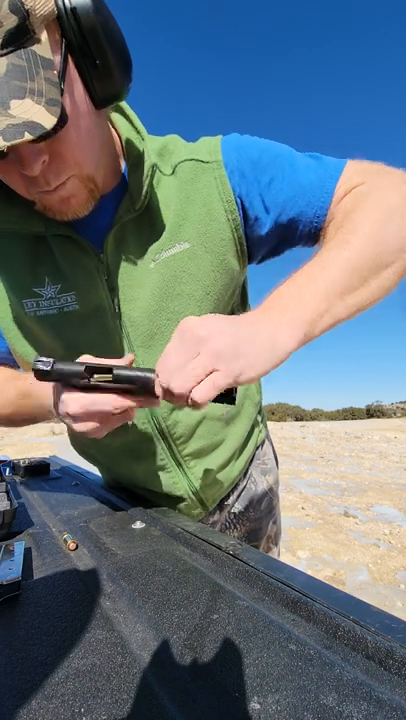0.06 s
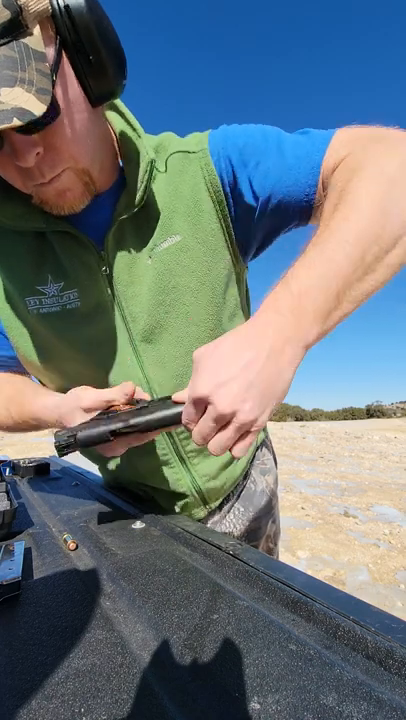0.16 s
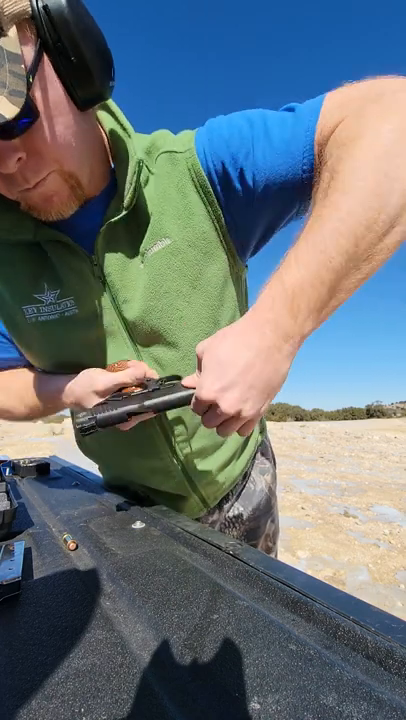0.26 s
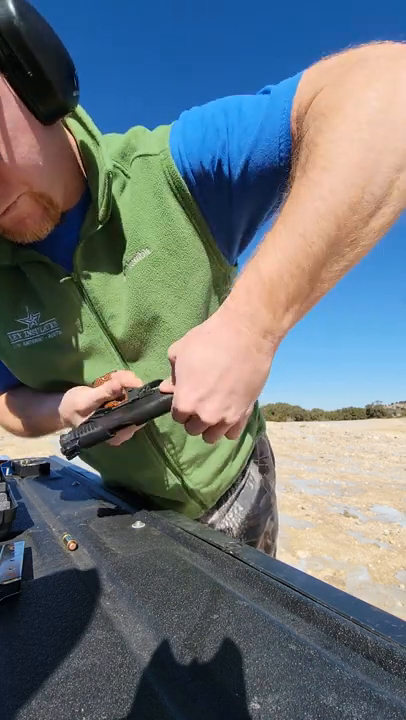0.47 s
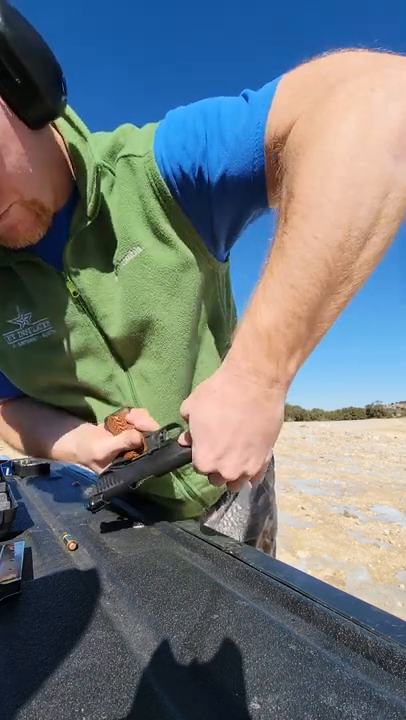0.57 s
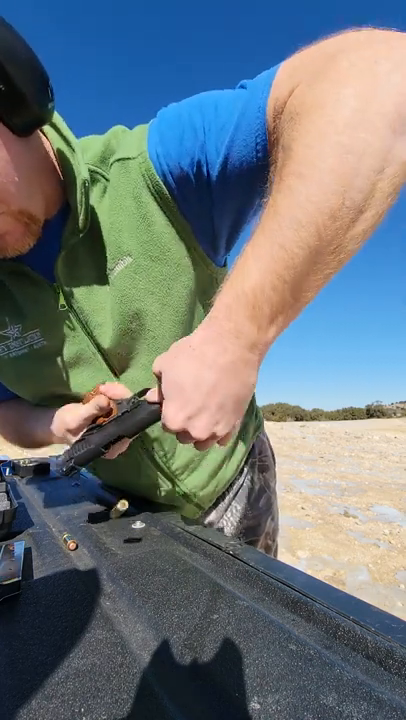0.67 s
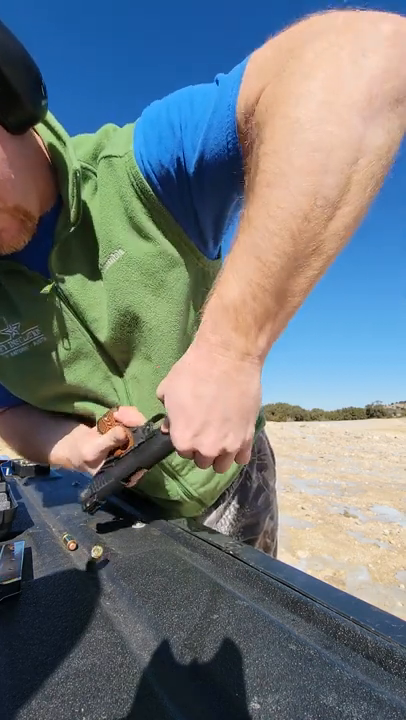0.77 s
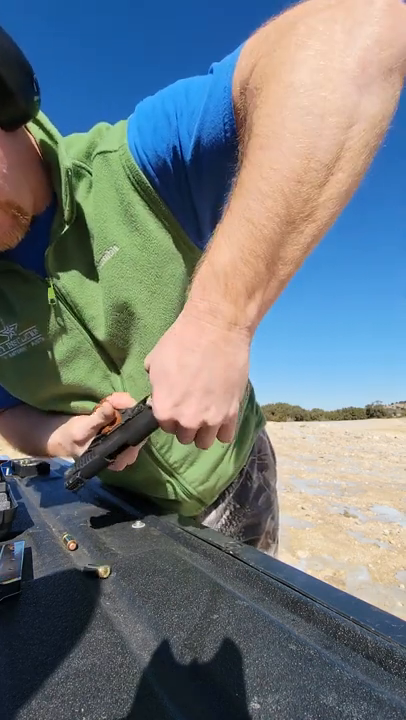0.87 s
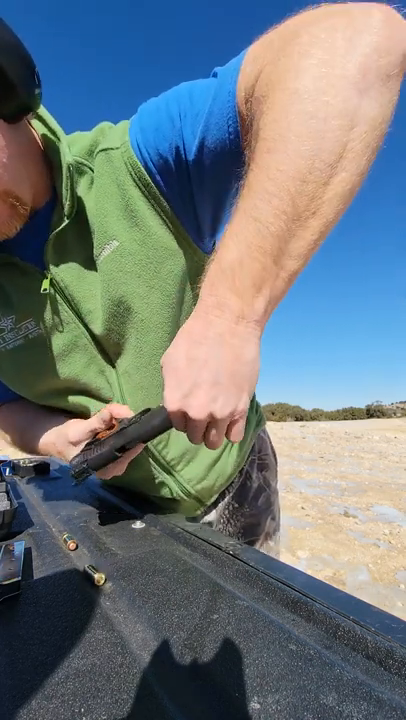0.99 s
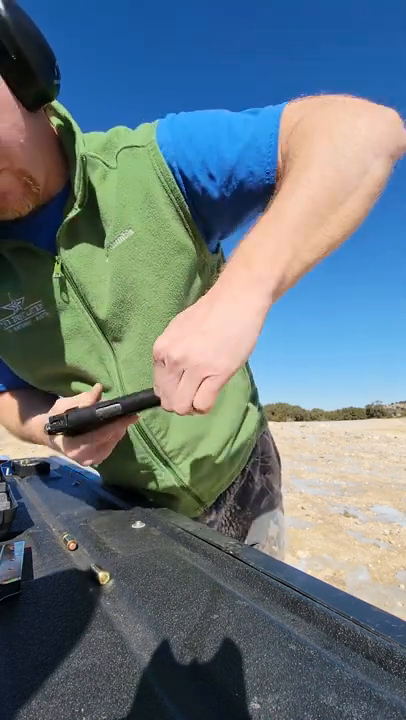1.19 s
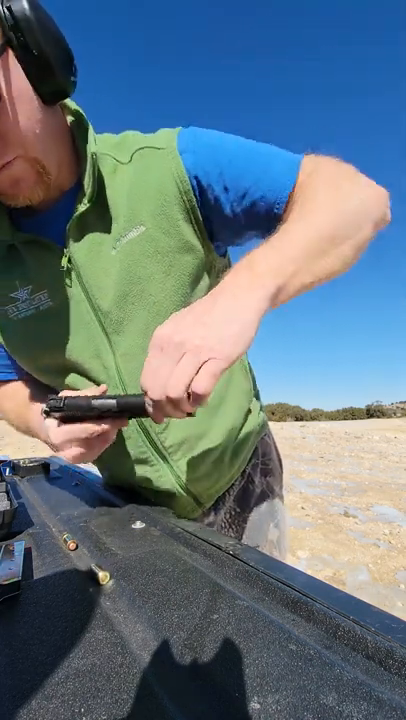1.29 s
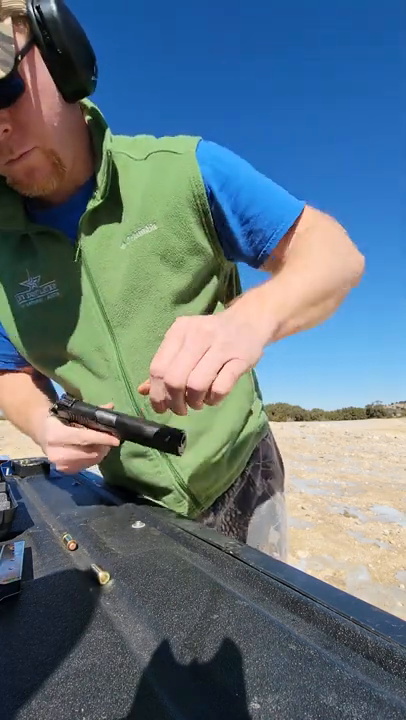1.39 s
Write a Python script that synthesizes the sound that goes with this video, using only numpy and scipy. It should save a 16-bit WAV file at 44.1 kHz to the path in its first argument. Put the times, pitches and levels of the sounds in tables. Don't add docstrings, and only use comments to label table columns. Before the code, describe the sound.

Close up in open air, handgun steel clacks and chatters in short bursts, a falling round knocks and bounces on a hard hollow surface, and the slide cracks closed, over light wind buffeting and faint hiss.

```python
import sys
import numpy as np
from scipy import signal
from scipy.fft import rfft, irfft, next_fast_len
from scipy.io import wavfile

SR = 44100
rng = np.random.default_rng(int(sys.argv[2]) if len(sys.argv) > 2 else 0)


def gain_from_db(level_db):
    decades = np.asarray(level_db, float) / 20
    return 10 ** decades


def unload_wav(signal):
    wavfile.write(
        sys.argv[1],
        SR,
        np.round(np.clip(np.atleast_2d(signal).T, -1, 1) * 32767).astype(np.int16),
    )


N = 63945

# t/s, peak level/dB, loudest ring f/Hz, contact/ms, brightness/dB
PULL_KNOCKS = [(.2096, -20.5, 1500, 5.1, -36), (.2225, -13.5, 5230, 1.1, -65),
               (.2255, -14, 4500, 0.86, -42), (.2448, -0.5, 5350, 0.53, -23.5),
               (.2665, -9, 5470, 0.98, -50), (.2752, -20, 5360, 1.01, -20), (.2795, -23, 6340, 1.9, -44),
               (.3985, -38, 5740, 2.5, -12), (.4155, -24, 3610, 2.33, -31), (.4545, -12.5, 5000, 1.07, -24),
               (.4882, -3.5, 4200, 2.05, -41), (.4906, -19, 4300, 0.96, -24),
               (.4988, -15, 3300, 1.1, -24.5), (.5102, -12, 6100, 1.47, -20), (.5135, -20, 3200, 3.5, -26),
               (.5205, -21.5, 4970, 3, -24), (.5368, -5, 3780, 1.02, -12), (.5395, -8.5, 5500, 2.2, -44)]
# t/s, peak level/dB, loudest ring f/Hz, contact/ms, brightness/dB
JIGGLE_KNOCKS = [(0.609, -24.5, 2200, 1.2, -32), (0.6184, -26, 3570, 0.49, -39),
                 (0.6269, -15, 3280, 0.72, -23), (0.63, -3, 5150, 0.9, -71), (0.6404, -22, 2570, 1.4, -29),
                 (0.6484, -24.5, 4900, 1.8, -27), (0.6534, -31.5, 6320, 0.89, 2),
                 (0.6614, -13, 3860, 1.195, -51), (0.6799, -19, 2100, 2.7, -16),
                 (0.6864, -20.5, 3540, 2.1, -49), (0.7053, -9, 5800, 1.5, -64),
                 (0.7084, -11, 6250, 1.3, -19), (0.7164, -10, 4840, 0.92, -33),
                 (0.7214, -22.5, 4950, 1.24, -38), (0.7447, -20, 5320, 2.3, -24),
                 (0.8026, -22.5, 2570, 1.16, -44)]
# t/s, peak level/dB, loudest ring f/Hz, contact/ms,
# brightness/dB
MORE_KNOCKS = [
    (.282, -24, 5570, 1.2, -42),
    (.388, -41, 5940, 0.76, -20),
    (.5435, -21, 4500, 1.4, -30),
    (.553, -34, 4000, 1.7, -28),
    (.811, -31, 4900, 2.1, -22),
    (1.30, -60, 6030, 1.1, -8),
    (1.382, -57.5, 2600, 1.46, -32.5),
]
# t/s, peak level/dB, loudest ring f/Hz, contact/ms, brightness/dB
CLOSE_KNOCKS = [
    (1.0803, -24.5, 6570, 0.67, -18.5),
    (1.099, -18, 4660, 1.02, -17),
    (1.1700, -13.5, 3220, 1.5, -24.5),
    (1.1735, -17.5, 5410, 2.5, -29.5),
    (1.1784, 1, 5090, 1.5, -19),
    (1.1928, -5, 6400, 1.09, -5),
    (1.35, -50, 5900, 1.1, -21),
]
# t/s, peak level/dB, f/Hz, t60/ms, rise/ms
STEEL_RINGS = [(.2235, -41.5, 922, 40, 2.7), (.2275, -46, 537, 24, 2.1), (.227, -32, 2625, 17, 1.2),
               (.2455, -29, 2520, 15, 1.9), (.4155, -35.5, 1003, 21, 0.88), (.4885, -27, 4360, 20, 0.72),
               (.4905, -31.5, 935, 22, 1.6), (.5372, -20, 3350, 12, 0.38), (.5385, -39.5, 1207, 58, 0.83),
               (.609, -44, 964, 70, 0.95), (.680, -32.5, 1250, 41, 1.5), (.681, -33, 3240, 20, 1),
               (.774, -51.5, 604, 19, 3), (.802, -41.5, 1420, 65, 0.56), (.802, -48, 920, 19, 0.62),
               (.639, -51.5, 496, 19, 2), (.4545, -31.5, 2320, 25, 0.59)]
# t/s, peak level/dB, f/Hz, t60/ms, rise/ms
CLOSE_RINGS = [
    (1.1792, -16, 2813, 27, 1.2),
    (1.182, -31.5, 2000, 25, 1.2),
    (1.184, -32, 1011, 30, 2),
    (1.1935, -27, 943, 17, 1.97),
    (1.194, -25.5, 2032, 20, 0.7),
    (1.2005, -34, 1017, 15, 1.8),
    (1.179, -14, 5270, 20, 0.35),
    (1.18, -23.5, 10400, 27, .7),
]
# f/Hz, width/Hz, level/dB
STEEL_MODES = [(1030, 720, -8), (1574, 760, -5), (2570, 480, -1.5), (3200, 1200, -3), (4500, 400, -3.5),
               (5230, 710, -8), (6400, 730, -1.5), (7300, 970, -7)]
# f/Hz, width/Hz, level/dB
SHINE_MODES = [(10400, 1800, 1.5), (12900, 1200, -2.5), (14150, 1200, 7)]
# t/s, level/dB
SCRAPE_PRESSURE = [(.195, -56), (.24, -58), (.285, -79), (.31, -74.5), (0.374, -56.5), (.44, -58),
                   (0.484, -44.5), (.525, -36.5), (.555, -54), (.59, -54), (.62, -49), (0.721, -38.5),
                   (.79, -56.5), (1.0, -76), (1.06, -35), (1.13, -53), (1.18, -35), (1.29, -70)]
# f/Hz, level/dB
STEEL_PAN = [(60, 6.5), (240, 2.5), (700, -3.5), (1290, -7.5), (2380, 0.5), (4400, -9), (15000, -6)]
# f/Hz, level/dB
CLOSE_PAN = [(200, 0.5), (700, -8), (1290, 0.5), (2380, 0.5), (4400, -4), (7500, -16), (10400, 11.5),
             (14000, -7.5)]
# t/s, peak level/dB, loudest ring f/Hz, contact/ms, brightness/dB
CARTRIDGE_TICKS = [
    (.8585, -2, 3370, .6, -44.5),
    (.9995, -7, 2010, 2.6, -43),
    (1.035, -19.5, 1878, 3.7, -35),
    (1.058, -29, 5650, 2.7, -19.5),
]
# f/Hz, width/Hz, level/dB
BRASS_MODES = [(1420, 890, -5), (2075, 250, 2.5), (2930, 1900, -20.5), (3750, 510, 8.5), (5500, 3300, -22)]
# t/s, peak level/dB, f/Hz, t60/ms, rise/ms
BRASS_RINGS = [
    (1.0005, -18, 1504, 45, 1.5),
    (1.001, -24.5, 2080, 85, 1.5),
    (1.0002, -29, 4200, 24, .8),
    (1.001, -33.5, 450, 110, 1.5),
    (0.88, -23, 1480, 70, 2.2),
    (.859, -25, 2080, 175, 0.5),
]
# t/s, level/dB, run-up/s, damping factor, bass level/dB
LANDINGS = [
    (0.8582, -13.5, 0.024, 0.76, -1.4),
    (0.931, -28, 0.00082, 0.19, -6),
    (1.0009, -29.5, 0.0025, 0.99, -11.5),
    (1.034, -36.5, 0.0017, 0.51, 4),
    (1.075, -50, .002, 1, 12.5),
]
# f/Hz, density level/dB per Hz
PANEL_COLOUR = [(50, -8), (200, -4), (600, -0.5), (1400, -8), (2100, -6.5), (3500, -8), (7000, -23),
                (12000, -30)]
# f/Hz, t60/s
PANEL_T60 = [(70, 0.86), (250, 0.53), (800, 0.42), (2000, 0.27), (4000, 0.068), (7000, 0.18), (14000, .27)]
# f/Hz, level/dB, t60/s
PANEL_MODES = [(70.7, -6.5, 0.26), (187.4, -5, 0.46), (219.7, 1, 0.26), (541.3, -4, 0.47), (821, -1.5, 0.3),
               (379.2, -7.5, 0.32), (1484, -12.5, 0.3)]
# f/Hz, level/dB
PANEL_PAN = [(60, 1), (200, 1), (700, -7.5), (2380, -5), (4400, -7), (15000, -5.5)]
# t/s, level/dB
GUSTS = [(0, -46), (0.036, -34.5), (0.078, -49), (.22, -46), (.31, -48.5), (0.4, -43.5), (.5, -55.5),
         (0.671, -37), (0.759, -62), (0.842, -33), (1.1, -59), (1.271, -43.5), (1.45, -52)]
# f/Hz, density level/dB per Hz
WIND_COLOUR = [(12, -47), (24, -13.5), (70, -2.5), (124, -15), (191, -23), (400, -36), (1500, -67.5),
               (1950, -100), (3300, -120)]
# f/Hz, density level/dB per Hz
HISS_COLOUR = [(470, -41), (800, -10.5), (1400, -22), (4340, -22.5), (5240, -9), (6020, -23), (9500, -27),
               (14000, -28)]

STEEL_UNLIKE, PANEL_UNLIKE = 0.55, 0.6


def rms_one(x):
    return x / np.sqrt(np.mean(x ** 2) + 1e-20)


def at_hz(points, hz):
    table_hz, value = np.transpose(points)
    return np.interp(np.log(np.maximum(hz, 1)), np.log(table_hz), value)


def pair_noise(size, unlike):
    noise = rng.standard_normal((3, size))
    unlike = np.clip(unlike, 0, 1)
    return np.sqrt(1 - unlike * unlike) * noise[0] + unlike * noise[1:]


def coloured(x, spectrum):
    gain = gain_from_db(at_hz(spectrum, np.fft.rfftfreq(N, 1 / SR)))
    return rms_one(irfft(rfft(x) * gain, N))


def resonate(x, hz, width_hz):
    r = np.exp(-np.pi * max(width_hz, 20) / SR)
    feedback = [1, -2 * r * np.cos(2 * np.pi * hz / SR), r * r]
    return signal.lfilter([(1 - r * r) / 2, 0, (r * r - 1) / 2], feedback, x)


def body(x, modes, spread_db=0):
    out = 0
    spread_db = spread_db + np.zeros(len(modes))
    for k, ((hz, width_hz, db), extra_db) in enumerate(zip(modes, spread_db)):
        out = out + (-1) ** k * gain_from_db(db + extra_db) * resonate(x, hz, width_hz)
    return out


def knocks(rows, modes):
    size, lead = 4096, 512
    rise_share, lead_db, lead_ms, tail_db, tail_ms = 0.9, -13.5, 1.9, -19, 8.86
    crack, spread_db, ring_db, ring_width_hz, shine_db = 6.15, 1.5, 5, 730, 22
    cut = signal.butter(3, 900, "high", fs=SR, output="sos")
    out = np.zeros((2, N + size))
    ms = (np.arange(size) - lead) / SR * 1000
    for s, db, hz, contact_ms, bright_db in rows:
        contact_ms = max(contact_ms, 0.2)
        rise_ms = rise_share * np.sqrt(contact_ms)
        late = np.maximum(ms - rise_ms, 0)
        run_in = gain_from_db(lead_db) * np.exp(np.minimum(ms, 0) / lead_ms) * (ms < rise_ms)
        decay = np.exp(-late / contact_ms) + gain_from_db(tail_db) * np.exp(-late / tail_ms)
        shape = run_in + np.clip(ms / rise_ms, 0, 1) ** 2 * decay
        burst = pair_noise(size, STEEL_UNLIKE) * shape
        burst[:, lead + int(rise_ms * SR / 1000)] += crack / contact_ms
        balance_db = spread_db * rng.standard_normal(len(modes))
        low = body(burst, modes, balance_db) + gain_from_db(ring_db) * resonate(burst, hz, ring_width_hz)
        high = body(burst, SHINE_MODES)
        knock = low / np.abs(low).max() + gain_from_db(bright_db + shine_db) * high / np.abs(high).max()
        i = int(s * SR) - lead
        out[:, i:i + size] += gain_from_db(db) * signal.sosfilt(cut, knock)
    return out[:, :N]


def rings(rows):
    size, roughness = 4096, 0.74
    out = np.zeros((2, N + size))
    ms = np.arange(size) / SR * 1000
    for s, db, hz, t60_ms, rise_ms in rows:
        rough = rms_one(resonate(pair_noise(size, STEEL_UNLIKE), hz, 4400 / t60_ms))
        tone = np.sin(2 * np.pi * hz * ms / 1000)
        shape = (1 - np.exp(-ms / max(rise_ms, 0.1))) * gain_from_db(-60 * ms / t60_ms)
        i = int(s * SR)
        out[:, i:i + size] += gain_from_db(db) * shape / shape.max() * (tone + roughness * rough)
    return out[:, :N]


def latch():
    start_s, hz, db, length_ms, width_hz = 0.2105, 4620, -9, 6.9, 110
    ms = (np.arange(N) / SR - start_s) * 1000
    shape = np.clip(ms, 0, 1) * np.clip((length_ms + 3 - ms) / 15.3, 0, 1)
    tone = np.sin(2 * np.pi * hz * ms / 1000)
    rough = rms_one(resonate(pair_noise(N, STEEL_UNLIKE), hz, width_hz))
    return gain_from_db(db) * shape * (tone + 0.2 * rough)


def scrape():
    grains_per_s, shine_db, trim_db = 3500, -3, -5.5
    catches = (rng.random(N) < grains_per_s / SR) * rng.exponential(1, N)
    grains = pair_noise(N, STEEL_UNLIKE) * (0.34 + catches)
    s, db = np.transpose(SCRAPE_PRESSURE)
    gain = gain_from_db(np.interp(np.arange(N) / SR, s, db, left=-120, right=-120) + trim_db)
    dull = rms_one(body(grains, STEEL_MODES))
    bright = rms_one(body(grains, SHINE_MODES))
    return gain * (dull + gain_from_db(shine_db) * bright)


def shaking(hz, t60):
    runup_db, low_delay_cycles, decay_bend, bass_hz = -2, 2.1, 1.297, 350
    t, shape = np.arange(N) / SR, 0
    for s, db, runup_s, damping, bass_db in LANDINGS:
        late = np.maximum(t - s, 0)
        build = 1 - np.exp(-late * hz / low_delay_cycles)
        after = build * gain_from_db(-60 * (late / (t60 * damping)) ** decay_bend)
        runup = np.clip(1 + (t - s) / runup_s, 0, 1) ** 2 * (t < s)
        before = gain_from_db(runup_db) * runup * min(1, (hz / 1500) ** 2)
        level_db = db + bass_db / (1 + (hz / bass_hz) ** 2)
        shape = shape + gain_from_db(level_db) * (after + before)
    return shape


def panel():
    rattle_db, modes_db, mode_width_hz = 1.0, -5.5, 18
    out = 0
    edges = 45 * 2 ** np.arange(0, 8.6, 0.5)
    white = [pair_noise(N, PANEL_UNLIKE), pair_noise(N, PANEL_UNLIKE)]
    knots = np.arange(N // 256 + 2) * 256
    wobble = np.interp(np.arange(N), knots, rng.standard_normal(len(knots)))
    rattle = gain_from_db(rattle_db * wobble)
    power = sum(gain_from_db(at_hz(PANEL_COLOUR, low * 1.19)) ** 2 * low * 0.41 for low in edges[:-1])
    total = np.sqrt(power * 2 / SR)
    for k, (low, high) in enumerate(zip(edges, edges[1:])):
        hz = np.sqrt(low * high)
        band_pass = signal.butter(2, [low, high], "band", fs=SR, output="sos")
        band = signal.sosfilt(band_pass, white[k % 2])
        gain = gain_from_db(at_hz(PANEL_COLOUR, hz)) / total
        out = out + gain * shaking(hz, at_hz(PANEL_T60, hz)) * band * rattle
    for hz, level_db, t60 in PANEL_MODES:
        mode = rms_one(resonate(pair_noise(N, 0.31), hz, mode_width_hz))
        out = out + gain_from_db(modes_db + level_db) * shaking(hz, t60) * mode
    return out


def wind():
    alike, pan_db, lump_db = 0.08, 3.5, 2.0
    t = np.arange(N) / SR
    lumps = np.array([np.interp(t, np.arange(64) / 40, row) for row in rng.standard_normal((2, 64))])
    side_db = pan_db / 2 * np.array([[1], [-1]])
    gain = gain_from_db(np.interp(t, *np.transpose(GUSTS)) + side_db + lump_db * lumps)
    return gain * coloured(pair_noise(N, np.sqrt(1 - alike)), WIND_COLOUR)


def hiss():
    return gain_from_db(-72) * coloured(pair_noise(N, 1.0), HISS_COLOUR)


def ports(pair, lag_ms, pan):
    size = next_fast_len(N + 1024)
    hz = np.fft.rfftfreq(size, 1 / SR)
    tilt = gain_from_db(at_hz(pan, hz) / 2)
    left = tilt * np.exp(-2j * np.pi * hz * lag_ms / 1000)
    return irfft(rfft(pair, size) * np.array([left, 1 / tilt]), size)[:, :N]


def scene():
    steel = knocks(PULL_KNOCKS, STEEL_MODES) + knocks(JIGGLE_KNOCKS, STEEL_MODES)
    steel = steel + knocks(MORE_KNOCKS, STEEL_MODES) + rings(STEEL_RINGS) + latch() + scrape()
    closing = knocks(CLOSE_KNOCKS, STEEL_MODES) + rings(CLOSE_RINGS)
    cartridge = knocks(CARTRIDGE_TICKS, BRASS_MODES) + rings(BRASS_RINGS)
    mix = ports(steel, 0.375, STEEL_PAN) + ports(closing, 0.3436, CLOSE_PAN)
    mix = mix + ports(cartridge, 0.401, PANEL_PAN) + ports(panel(), 0.693, PANEL_PAN)
    return mix + wind() + hiss()


def band_limit(x):
    return signal.sosfilt(signal.butter(12, 16540, fs=SR, output="sos"), x)


def record(dry):
    edge_hz, top_hz, top_db, cutoff_hz, full_scale = 8000, 8630, -12.5, 16500, 0.9
    low = signal.sosfilt(signal.butter(6, edge_hz, fs=SR, output="sos"), dry)
    top = signal.sosfilt(signal.butter(4, top_hz, "high", fs=SR, output="sos"), dry)
    held = np.clip(low + gain_from_db(top_db) * top, -full_scale, full_scale)
    mix = signal.sosfilt(signal.cheby2(16, 60, cutoff_hz, fs=SR, output="sos"), held)
    return band_limit(mix)


dry = scene()
out = record(dry)
unload_wav(out)
```